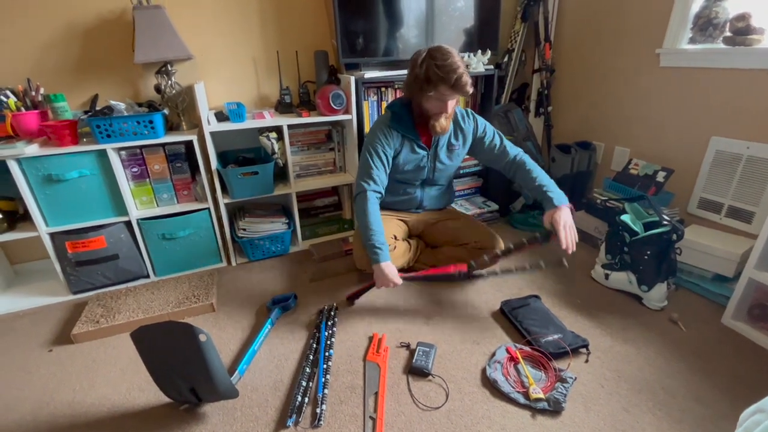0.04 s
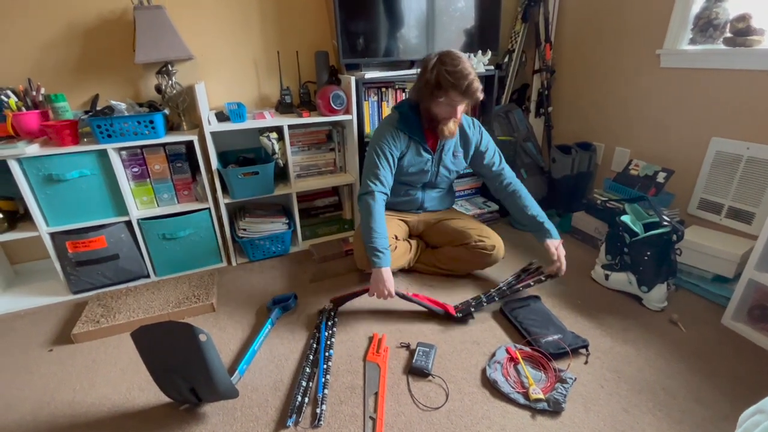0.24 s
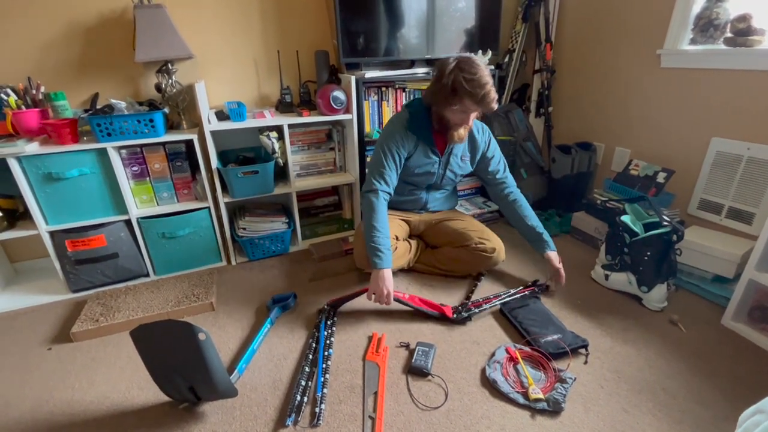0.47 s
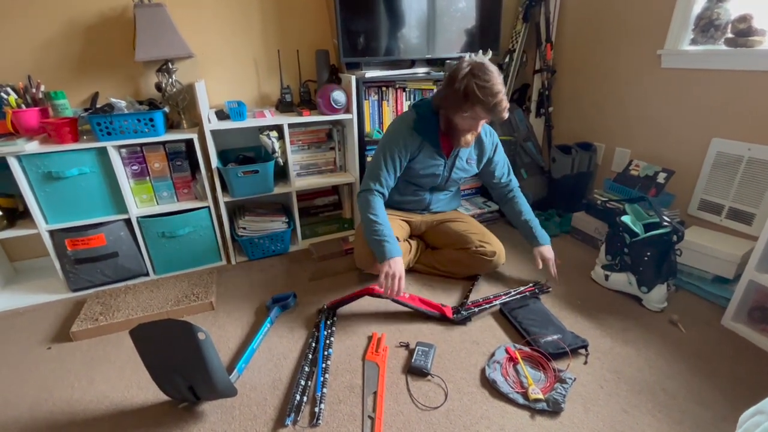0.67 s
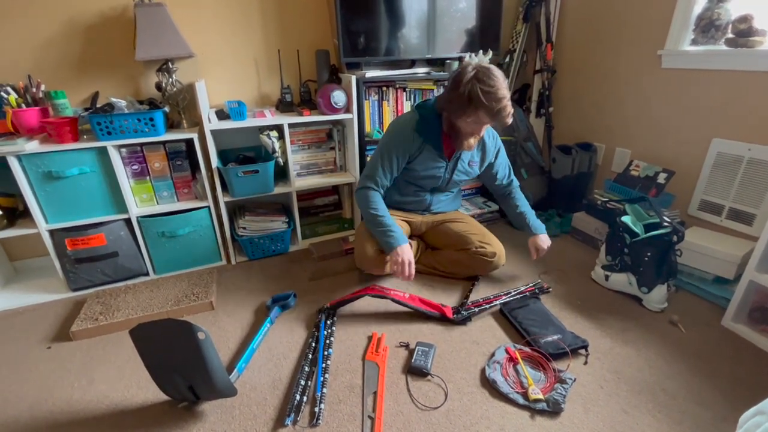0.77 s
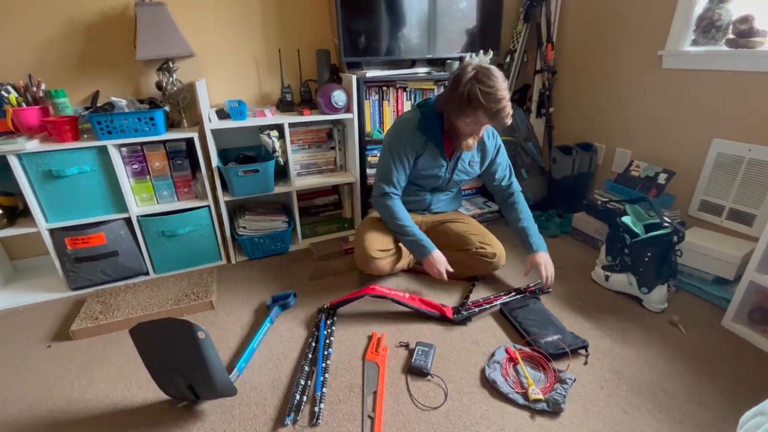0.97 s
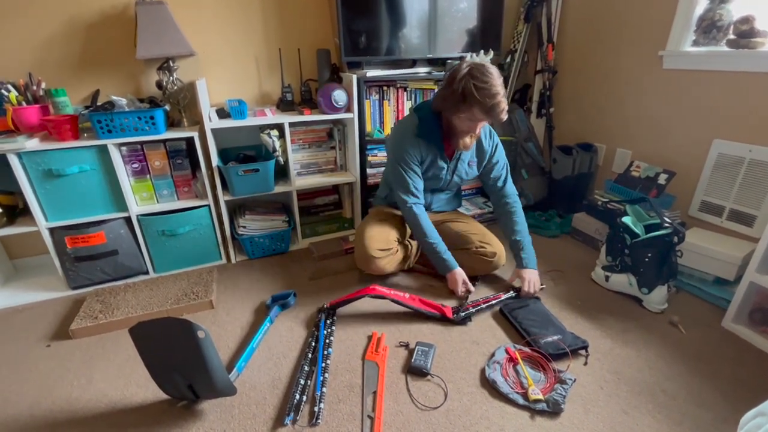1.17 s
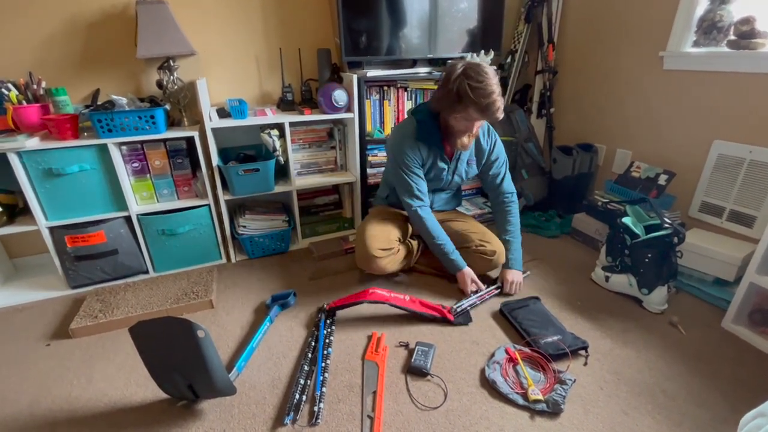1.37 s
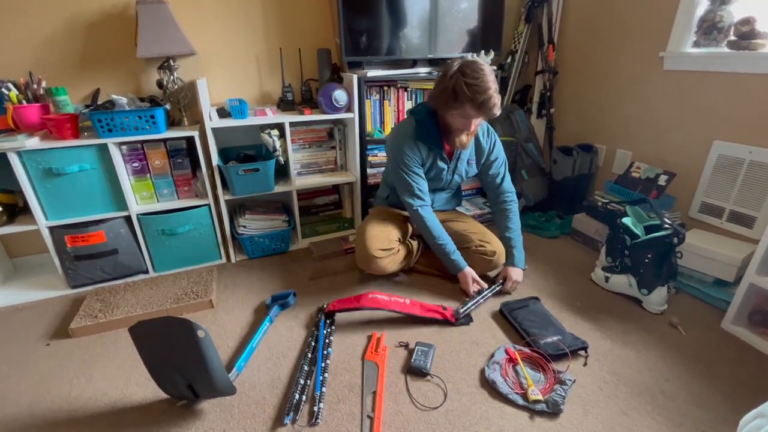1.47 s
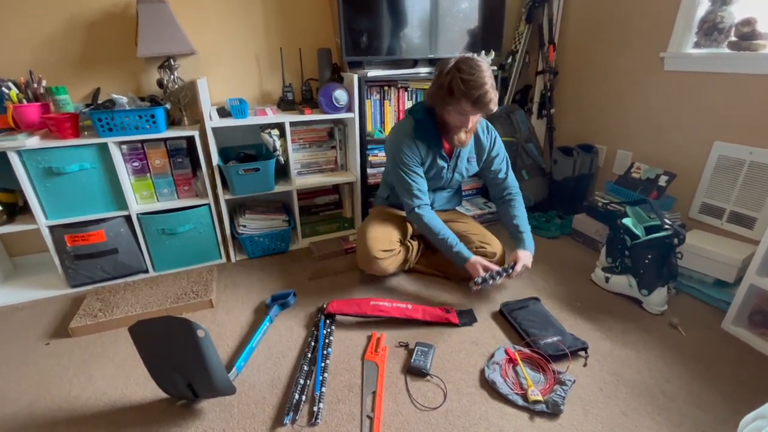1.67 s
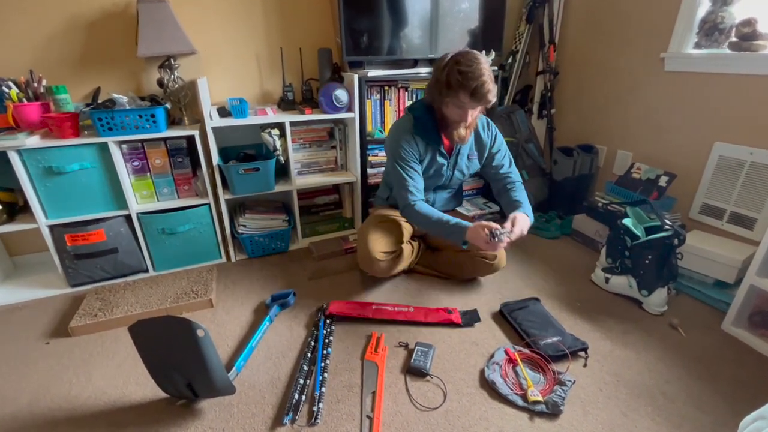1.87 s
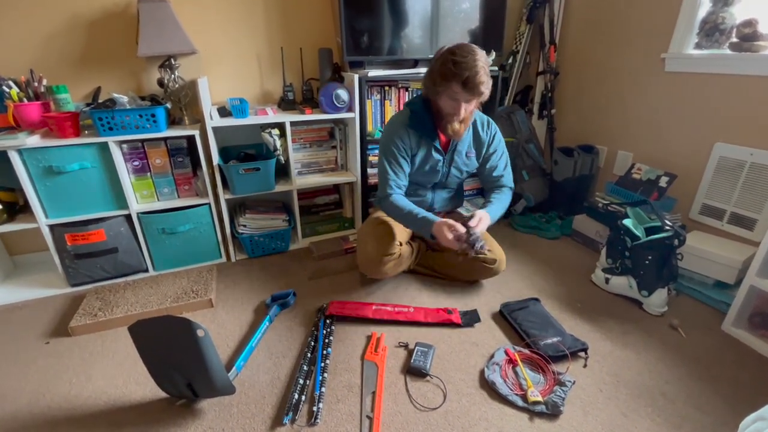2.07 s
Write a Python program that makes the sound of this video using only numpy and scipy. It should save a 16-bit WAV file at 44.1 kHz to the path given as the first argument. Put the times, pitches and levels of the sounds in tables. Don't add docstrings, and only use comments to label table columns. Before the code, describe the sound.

Thin hollow metal tubes fall on carpet with a sharp bright clatter and soft thuds, settle into quiet, then click and rattle as hands gather and lift them; small furnished room, stereo microphone close by.

```python
import sys
import numpy as np
from scipy import signal
from scipy.fft import rfft, irfft, next_fast_len
from scipy.io import wavfile
from scipy.ndimage import uniform_filter1d, map_coordinates

SR = 44100
rng = np.random.default_rng(int(sys.argv[2]) if len(sys.argv) > 2 else 0)


def how_loud(loudness_db):
    steps = np.asarray(loudness_db, float) / 20
    return 10 ** steps


def int16_out(signal):
    q = np.round(np.clip(np.atleast_2d(signal).T, -1, 1) * 32767)
    wavfile.write(sys.argv[1], SR, q.astype(np.int16))


N = 93668

# f/Hz, level/dB
HUM_SPECTRUM = [(15, -26.5), (25, -5), (112, 3), (559, -31), (2050, -21), (2330, -20.5), (9440, -31),
                (11000, -19), (14300, -56.5), (22000, -120)]
# f/Hz, T60/s
ROOM_DECAY = [(300, 0.2), (1300, 0.16), (3500, 0.21), (12000, 0.14)]
# t/s, level/dB
SLEEVE_LEVEL = [
    (.0, -41.5),
    (0.298, -45.5),
    (.58, -65),
    (.78, -67),
    (.95, -55),
    (1.05, -60.5),
    (1.299, -43),
    (1.6, -60.5),
    (1.92, -62),
    (1.971, -77),
]
# f/Hz, level/dB
CLOTH_SPECTRUM = [(120, -37), (200, -8.5), (694, -17), (890, -15.5), (1180, -12.5), (9300, -11.5),
                  (14000, -18.5)]
# t/s, f/Hz, level/dB
FINGER_DRAG = [
    (.97, 1373, -82),
    (1.006, 1487, -63.5),
    (1.03, 1640, -68),
    (1.065, 1630, -62),
    (1.085, 1634, -85),
]
THUD_TIMES = [.11, .108, .108, .109, .112, .135, .14, .343, .355, .355, .345, .775, .92, 1.19, 1.2]
# level/dB, f/Hz, T60/s
THUD_MODES = [(-37.5, 171, 0.13), (-23.5, 733, 0.032), (-30.5, 760, 0.021), (-27.5, 560, 0.015),
              (-38, 538, 0.13), (-29.5, 240, .06), (-39, 72, .14), (-33.5, 276.4, 0.061), (-44, 200, 0.15),
              (-41.5, 101.4, 0.17), (-44.5, 700, 0.038), (-57.5, 340, 0.046), (-66, 460, 0.12),
              (-57.5, 540, 0.2), (-58, 270, 0.15)]
# t/s, level/dB, strongest ring f/Hz, rattle length/s, brightness/(dB per octave)
DROP_CLACKS = [(.001, -18, 5930, 0.014, 4), (0.022, -17.5, 9400, 0.011, -3),
               (0.034, -21.5, 9700, 0.014, -6), (0.046, -20, 10040, 0.014, 4.5),
               (0.1066, -20, 6700, 0.0095, 2.5), (0.1148, -5, 8900, 0.0022, 3),
               (0.1158, -6.5, 13000, 0.0011, 11), (0.1242, -8, 9480, 0.001, 8),
               (0.128, -14.5, 8770, 0.0071, 4.5), (0.1377, -6.5, 6733, 0.0051, 9),
               (0.141, -12.5, 8600, 0.014, 1), (0.156, -15.5, 9130, 0.019, 7.5),
               (0.189, -21, 8800, 0.023, 1.5), (0.215, -18.5, 8950, 0.018, 5),
               (0.231, -22, 3376, 0.0091, -4), (0.273, -32.5, 3240, 0.033, 1),
               (0.345, -17, 3090, 0.004, 4.5), (0.35, -11.5, 6865, 0.0055, 9),
               (0.3545, -9.5, 5460, 0.0067, 6.5), (0.404, -29, 5000, 0.022, -4.5),
               (0.429, -28, 3423, 0.017, -2), (0.4891, -20.5, 3240, 0.0043, -0.6),
               (0.5152, -22.5, 3205, .004, -1.5), (0.6807, -48, 2830, 0.0021, -11),
               (0.681, -43.5, 2010, 0.0017, -11)]
GATHER_CLACKS = [(1.0824, -23.5, 3230, 0.0077, 0.7), (1.1716, -19.5, 5090, 0.0066, 3.1),
                 (1.1779, -20.5, 5390, 0.0058, 0.5), (1.208, -30.5, 4570, 0.008, 0.44),
                 (1.2513, -22.5, 8940, 0.0093, 0.5), (1.2636, -42, 6870, 0.0089, 0.72),
                 (1.291, -18.5, 4910, 0.0075, 0.42), (1.304, -21, 3000, 0.008, 0.46),
                 (1.313, -18.5, 8760, 0.005, 3), (1.3221, -21.5, 2800, 0.0055, 0.76),
                 (1.3478, -25, 4800, 0.0094, 0.46), (1.3743, -15, 8660, 0.0095, 9.6),
                 (1.3913, -15, 4150, 0.008, 0.5), (1.4045, -21, 9440, 0.0094, 0.57),
                 (1.4547, -18, 5000, 0.004, 3.5), (1.4648, -26.5, 4950, 0.0031, 1.2),
                 (1.5161, -17.5, 9085, 0.0063, 2.8), (1.526, -45, 9500, 0.0065, 5.8)]
LIFT_CLACKS = [(1.6, -33, 4200, 0.0078, 2.5), (1.6045, -22, 6737, 0.014, 2.5), (1.618, -33, 4550, 0.017, 0),
               (1.644, -27, 4640, 0.026, -0.2), (1.73, -25, 9510, .004, 6.5), (1.7336, -15, 4864, .012, 7),
               (1.745, -26.5, 9400, 0.019, -2), (1.76, -30, 4660, .02, 2.5), (1.785, -36.5, 4500, 0.033, 1),
               (1.837, -36.5, 6670, 0.016, 0.7), (1.896, -38.5, 4580, 0.038, 2.5),
               (1.917, -42.5, 4660, 0.023, 4), (1.972, -38, 8700, 0.01, 1.5), (2.012, -28, 8800, 0.025, 1),
               (2.027, -30, 2050, 0.023, 1), (2.0694, -21.5, 8600, 0.0097, 6.5),
               (2.082, -35, 4600, 0.019, 25), (0.8202, -51, 2900, 0.0073, -12.5)]
MORE_CLACKS = [(0.242, -23.5, 3070, 0.0044, 4.5), (0.26, -36, 5100, .006, 8),
               (.266, -35, 3380, 0.0048, 9.5), (0.312, -32.5, 3270, 0.011, 1.5),
               (0.372, -40, 5360, 0.0059, -6.5), (0.443, -34, 3316, 0.0062, 8),
               (0.496, -27, 5030, 0.0028, 1), (0.5305, -37.5, 3130, 0.0079, 4),
               (1.089, -32, 3060, 0.0055, 0), (1.241, -33, 2050, 0.0097, 0.5),
               (1.331, -25.5, 2960, 0.0043, -2), (1.358, -27.5, 4970, 0.005, -3),
               (1.3866, -22, 5250, 0.0022, 1), (1.462, -29, 3550, 0.0054, 0),
               (1.5276, -24.5, 8730, .002, 3.5), (1.549, -37, 8600, 0.011, 15),
               (2.074, -22, 4940, 0.0026, 9.5), (2.085, -23, 5120, 0.0038, 7),
               (1.418, -33, 4780, 0.016, -1)]
# f/Hz, level/dB, T60/s
TUBE_MODES = [(1022.5, -11.5, 0.037), (2050, -4.5, 0.032), (3240, -3, 0.03), (4730, -9, 0.054),
              (5183, -4, 0.032), (6040, -9, 0.024), (6883, -6.5, 0.042), (8600, -9.5, 0.037),
              (8837, -8.5, 0.024), (12930, -13.5, 0.044), (11660, -16.5, 0.034)]
# f/Hz, level/dB
WALL_SPECTRUM = [(300, -47.5), (800, -36.5), (1600, -3), (2200, 11), (4000, 11), (6000, 12), (9000, 8.5),
                 (14000, -3.5)]
# t/s, left minus right level/dB
BUNDLE_PAN = [
    (0, 2),
    (.2, -6),
    (0.351, 6),
    (.7, -4.5),
    (1.1, -5.5),
    (1.6, 0.7),
    (2.1, 2.5),
]
# f/Hz, left minus right level/dB
PORT_COLOUR = [(400, -2), (700, -1), (1300, -6.5), (2400, -1.5), (4400, 8.5), (8100, -5), (12000, -3.5)]
# f/Hz, level/dB
TREBLE_COLOUR = [(8200, -.5), (9300, 4), (11000, -5), (11900, -11), (12800, -1.5), (14000, -1.5),
                 (14800, -10), (16000, -21.5)]


def curve(table, hz):
    table = np.array(table, float)
    return np.interp(np.log(np.maximum(hz, 1)), np.log(table[:, 0]), table[:, 1])


def colour(x, table, share=1):
    size = next_fast_len(x.shape[-1])
    gain = how_loud(share * curve(table, np.fft.rfftfreq(size, 1 / SR)))
    return irfft(rfft(x, size) * gain, size)[..., :x.shape[-1]]


def unit(x):
    return x / np.sqrt(np.mean(x ** 2))


def walk(rate):
    k = int(SR / rate)
    return unit(uniform_filter1d(uniform_filter1d(rng.standard_normal(N), k), k))


def hum():
    level_db, motor_hz, motor_db = -61.5, 111, -67
    mid, side = colour(rng.standard_normal((2, N)), HUM_SPECTRUM)
    side = colour(side, [(60, -6.5), (130, -13.0), (500, -3.0)])
    phase = 2 * np.pi * np.cumsum(motor_hz * (1 + 0.042 * walk(12.0))) / SR
    motor = np.sin(phase) * how_loud(motor_db + 1.1 * walk(42))
    return unit(np.array([mid + side, mid - side])) * how_loud(level_db) + motor


def room(x):
    level_db, gap_s = -4, .007
    t, tail = np.arange(SR // 2) / SR, 0
    for hz in 125 * 2 ** np.arange(0, 7.1, 1):
        edges = [hz / 2 ** .5, min(hz * 2 ** .5, .45 * SR)]
        octave = signal.butter(2, edges, "band", fs=SR, output="sos")
        band = signal.sosfilt(octave, rng.standard_normal((2, len(t))))
        tail = tail + band * how_loud(-60 * t / np.maximum(curve(ROOM_DECAY, hz), .05))
    tail = tail * np.clip(t / gap_s - .5, 0, 1)
    tail = tail / np.sqrt(np.sum(tail ** 2) / 2)
    return signal.fftconvolve(x, tail, axes=1)[:, :N] * how_loud(level_db)


def rustle():
    table = np.array(SLEEVE_LEVEL)
    grain = rng.standard_normal((2, N)) * how_loud(2.0 * walk(55) + 0.71 * walk(300))
    effort_db = np.interp(np.arange(N) / SR, table[:, 0], table[:, 1])
    return unit(colour(grain, CLOTH_SPECTRUM)) * how_loud(effort_db)


def scrape():
    t, table = np.arange(N) / SR, np.array(FINGER_DRAG)
    hz = np.interp(t, table[:, 0], table[:, 1]) * (1 + .09 * walk(300))
    stutter = how_loud(6 * walk(110))
    level = how_loud(np.interp(t, table[:, 0], table[:, 2]))
    return np.sin(2 * np.pi * np.cumsum(hz) / SR) * stutter * level


def thuds():
    rise_s = .0025
    t, out = np.arange(N) / SR, 0
    for at, (db, hz, t60) in zip(THUD_TIMES, THUD_MODES):
        age = np.maximum(t - at, 0)
        swing = np.sin(2 * np.pi * hz * age + .35 * walk(70)) * how_loud(db + 1.5 * walk(90))
        decay = how_loud(-60 * age / np.clip(t60, .015, .2))
        out = out + swing * (1 - np.exp(-age / rise_s)) * decay * 1.5
    return out


def ring(f, hz, t60):
    pole = np.exp(2j * np.pi * hz / SR - np.log(1000) / (np.maximum(t60, .004) * SR))
    z = np.exp(-2j * np.pi * f / SR)
    return pole.imag * z / (1 - 2 * pole.real * z + abs(pole) ** 2 * z ** 2)


def clacks(count=16):
    block, rise_s, wall_t60_s, ring_t60_s = 8192, .0015, .005, .016
    contact_scatter_db, mode_scatter_db, port_scatter_db, mode_detune = 4, 4, .5, .0159
    ring_db, crack_db, clack_db = 7, 4.5, -4
    rows = np.array(DROP_CLACKS + GATHER_CLACKS + LIFT_CLACKS + MORE_CLACKS, float)
    tubes, out = np.array(TUBE_MODES), np.zeros((2, N + block))
    m = len(tubes)
    f, age = np.fft.rfftfreq(block, 1 / SR), np.arange(block) / SR
    thin = f ** 2 / np.sqrt(f ** 4 + 844.0 ** 4)
    wall_gain = how_loud(crack_db + curve(WALL_SPECTRUM, f))
    for t, db, hz, length, tilt in rows:
        chance = rng.standard_normal((6, 16))
        u = (np.arange(count) + rng.random(count)) / count
        dense = rng.standard_normal((2, block))

        start = int(max(t - rise_s, 0) * SR)
        when = u ** 1.5 * (np.clip(length, .0005, .06) + rise_s)
        size = how_loud(contact_scatter_db * chance[0, :count] - 10.6 * u ** 3.0) * np.sign(chance[1, :count])
        size = size * np.minimum(0.54 + when / rise_s, 1)
        push = size @ np.exp(-2j * np.pi * np.outer(when, f))

        def fed(at):
            return np.clip(np.sqrt(size @ size) / np.interp(at, f, abs(push)), .4, 2.5)

        pitch = tubes[:, 0] * (1 + mode_detune * chance[2, :m])
        modes = ring(f, pitch[:, None], tubes[:, 2:]) * fed(pitch)[:, None]
        mix_db = tubes[:, 1] + mode_scatter_db * chance[3, :m] + port_scatter_db * chance[4:, :m]
        mix = how_loud(mix_db) * np.sign(chance[4:, :m] + .6)
        strongest = how_loud(ring_db) * fed(hz) * ring(f, hz, ring_t60_s)

        crack = dense[0] + 0.88 * dense[1] * np.array([[1], [-1]])
        walls = rfft(crack * how_loud(-60 * age / wall_t60_s)) * wall_gain
        body = thin * (mix @ modes + strongest) + walls

        bright = how_loud(np.clip(tilt - 1.5, -6, 6) * np.log2(np.maximum(f, 2200) / 5000))
        y = irfft(push * body * bright, block)
        peak = np.sqrt(np.max(uniform_filter1d(np.mean(y ** 2, 0), size=64)) * 2)
        out[:, start:start + block] += y * how_loud(db + clack_db) / peak
    return out[:, :N]


def late(x, lag_s):
    return map_coordinates(x, [np.arange(N) - lag_s * SR])


def scene():
    port_lag_s = 0.0006373
    tubes, floor = clacks(), thuds()
    side = how_loud(np.interp(np.arange(N) / SR, *np.array(BUNDLE_PAN).T) / 2)
    left = late(tubes[0], port_lag_s) * side + late(floor, port_lag_s / 2)
    right = tubes[1] / side + floor
    heard = np.array([left, right]) + room(tubes + 0.72 * floor) + rustle() + scrape()
    ports = np.array([colour(heard[0], PORT_COLOUR, 0.52), colour(heard[1], PORT_COLOUR, -0.27)])
    return ports + hum()


def top_cut(x):
    return signal.sosfilt(signal.butter(12, 16530, fs=SR, output="sos"), x)


def record(dry):
    top_hz = 16300
    low_pass = signal.ellip(8, .2, 70, top_hz, fs=SR, output="sos")
    heard = signal.sosfilt(low_pass, colour(dry, TREBLE_COLOUR))
    return top_cut(heard)


dry = scene()
out = record(dry)
int16_out(out)
```